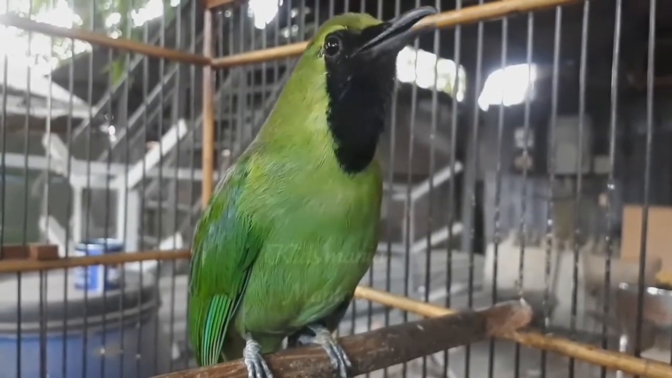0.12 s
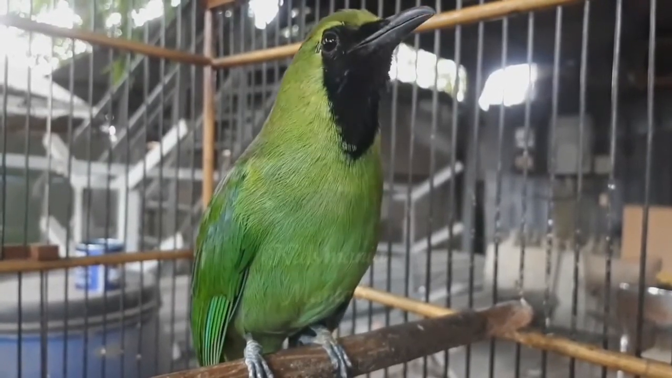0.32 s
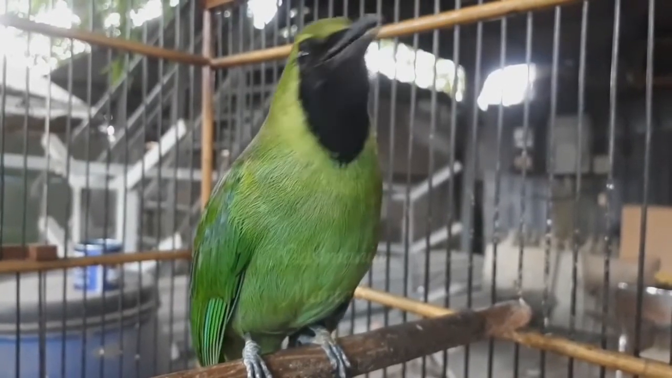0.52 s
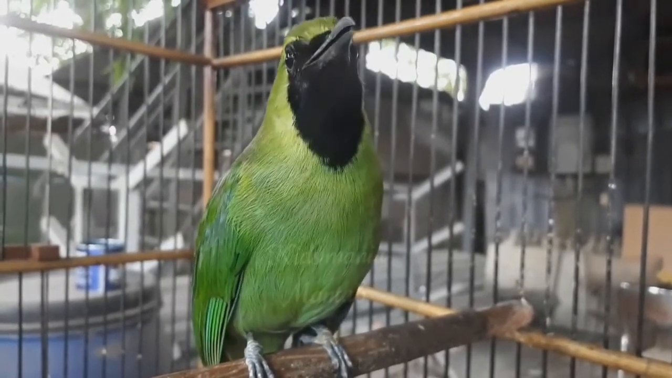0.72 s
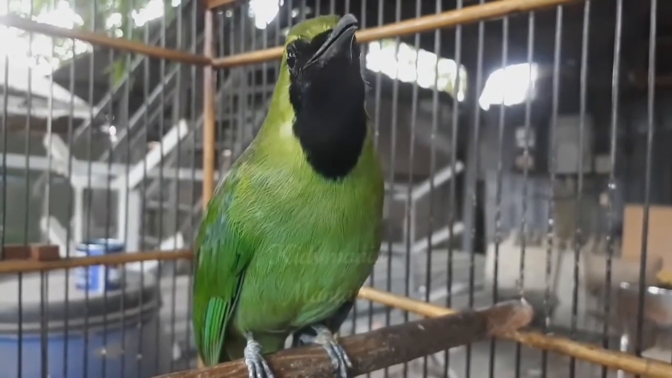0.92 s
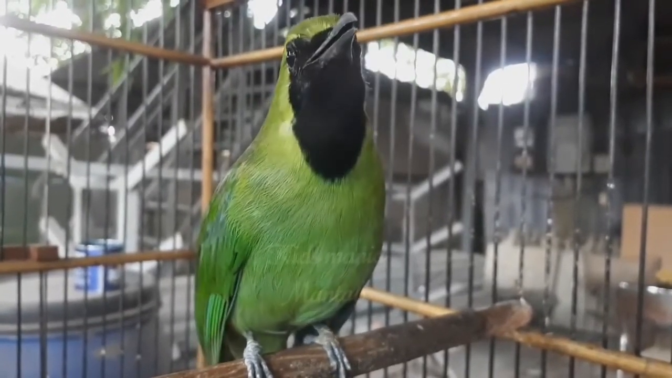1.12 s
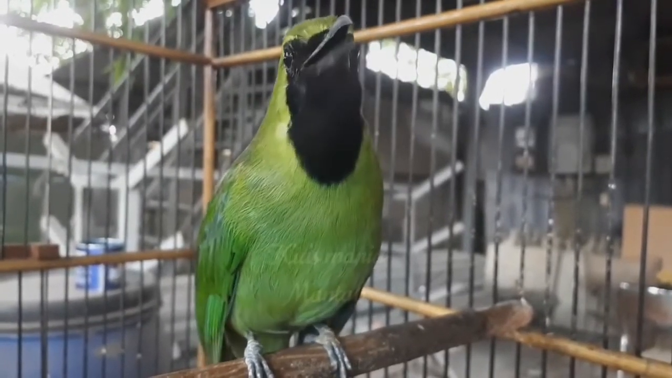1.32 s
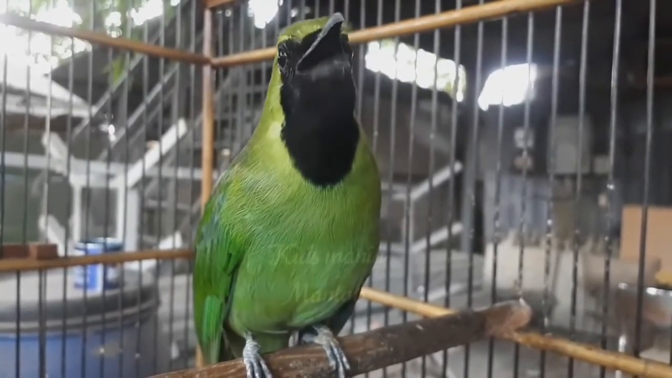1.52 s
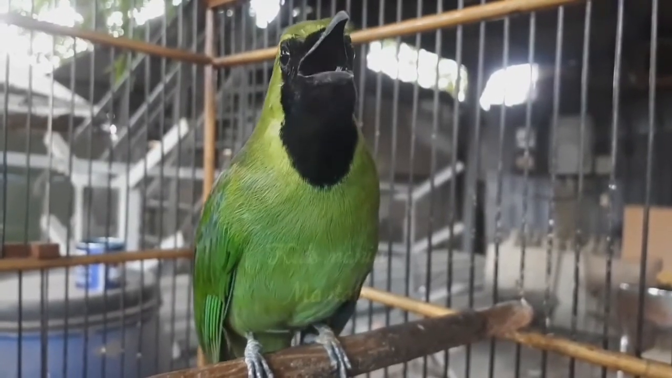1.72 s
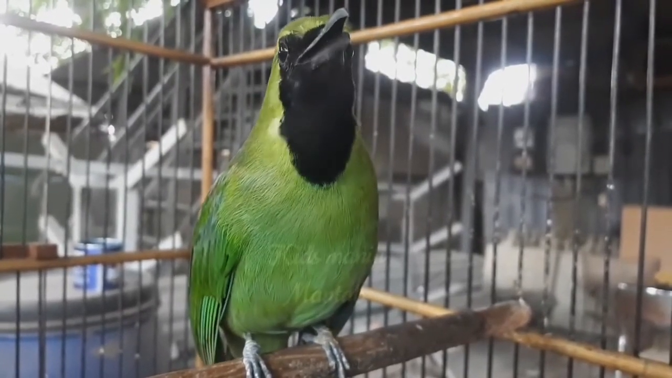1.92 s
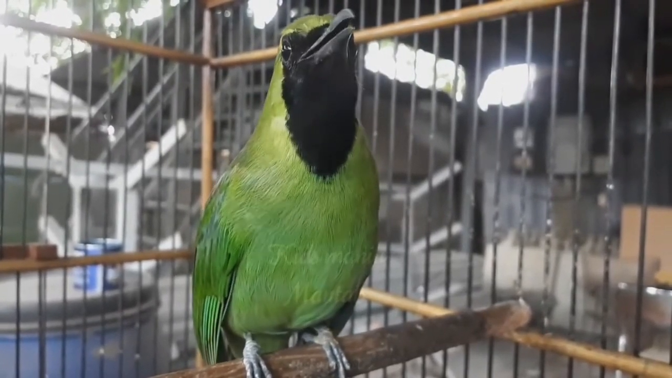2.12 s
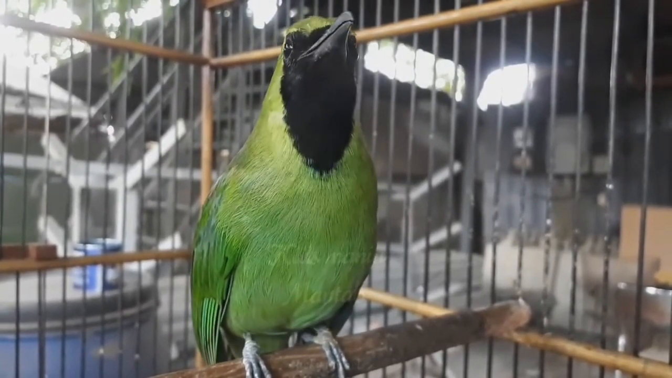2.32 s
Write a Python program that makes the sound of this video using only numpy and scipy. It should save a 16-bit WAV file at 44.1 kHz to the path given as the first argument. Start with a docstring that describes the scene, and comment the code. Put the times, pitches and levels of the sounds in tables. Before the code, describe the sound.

A caged songbird sings loudly, close up. Two tiny ticks lead to a clear falling whistle at 0.2 s. A rough, fast buzz comes at 0.7 s, then short whistles from 0.9 to 1.3 s, about ten per second. Six sharp two-voiced chirps climb higher from 1.37 to 1.94 s; a whistled flourish ends at 2.2 s. Behind: short room echo, low hum, soft air, slowly growing distant noise, a faint far call near the end.

```python
"""Over a low hum come two tiny ticks and a falling whistle: a caged leafbird sings close to the microphone.
A buzz follows, then a run of whistles that turns into two-voiced chirps, and a closing flourish.
Each side of its voice organ (the syrinx) is a near-pure wavering tone with weak overtones and airy rasp.
Short noise bursts make the ticks before many notes. Fading noise makes the room ring; behind it lie
steady air noise, a slowly growing far-off noise and a faint distant call."""
import sys
import numpy as np
from scipy import signal
from scipy.fft import rfft, irfft
from scipy.io import wavfile
from scipy.ndimage import uniform_filter1d, minimum_filter1d

SR = 44100
rng = np.random.default_rng(int(sys.argv[2]) if len(sys.argv) > 2 else 0)


def put_to_file(sound):
    """Save the sound as 16-bit audio at rate SR, in the file named by the first command-line argument."""
    columns = np.atleast_2d(sound).T  # one column per channel
    safe = np.clip(columns, -1, 1)
    whole_steps = np.round(safe * 32767)
    wavfile.write(sys.argv[1], SR, whole_steps.astype(np.int16))


N = 108045
T = np.arange(N) / SR  # time of each sample, s


def amp(db):
    """Turn decibels into a gain."""
    return 10 ** (np.asarray(db) / 20)


def gain_at(hz, points):
    """Read the gain at a pitch from a (frequency [Hz], level [dB]) curve."""
    point_hz, point_db = np.array(points, float).T
    return amp(np.interp(np.log(np.maximum(hz, 1)), np.log(point_hz), point_db))


def colour(x, points):
    """Make some frequencies louder or softer, following a (frequency [Hz], level [dB]) curve."""
    n = x.shape[-1]
    hz = np.arange(n // 2 + 1) * SR / n
    return irfft(rfft(x) * gain_at(hz, points), n)


def noise(points):
    """Coloured noise with an rms of 1."""
    x = colour(rng.standard_normal(N), points)
    return x / x.std()


def wander(rate):
    """Smooth random drift of spread 1, with changes up to about rate [Hz]."""
    hz = np.arange(N // 2 + 1) * SR / N
    x = irfft(rfft(rng.standard_normal(N)) * np.exp(-(hz / rate) ** 2), N)
    return x / x.std()


def gate(start, end, edge):
    """The syrinx opens and closes softly, taking edge [s] each way."""
    return np.sin(np.pi / 2 * np.clip(np.minimum(T - start, end - T) / edge, 0, 1)) ** 2


WARBLE_HZ = 114.5  # pitch swings per second


def warble(crest):
    """Fast swing of the pitch, highest at time crest [s]."""
    return np.cos(2 * np.pi * WARBLE_HZ * (T - crest))


# How the throat passes the main tone: (frequency [Hz], gain [dB])
THROAT = [(1300, -6), (3000, 6), (3500, -4), (4100, -4.5), (5800, -22)]
# Strength of harmonics 2 to 8 against the main tone before the throat, before offset and flicker: (level [dB])
OVERTONE_DB = [-31.5, -42.5, -39.5, -31, -41.5, -47, -47]
# Tone colour of the rasping air in the throat: (frequency [Hz], relative level [dB per Hz])
RASP = [(500, -6), (1100, -4.5), (3200, 6), (4900, 2.5), (7500, 0), (10500, -6.5), (12500, -1.5),
        (15500, -13.5)]


def voice(notes, jitter, overtone_db=0):
    """One syrinx side plays (pitch, envelope, rasp dB) notes as a near sine with flickering overtones and rasp."""
    env = sum(e for _, e, _ in notes)
    steady_hz = sum(f * e for f, e, _ in notes) / (env + 1e-12)
    hz = steady_hz * (1 + jitter * wander(450))
    phase = 2 * np.pi * np.cumsum(hz) / SR
    tone = gain_at(hz, THROAT) * np.sin(phase)
    for k, db in enumerate(OVERTONE_DB, 2):
        level = amp(db + overtone_db + 4 * wander(330))
        tone = tone + (k * hz < SR / 2) * level * np.sin(k * phase)  # skip what is too high to store
    rasp = noise(RASP) * sum(e * amp(db) for _, e, db in notes)
    return np.sqrt(2) * env * tone + rasp


CLEAN_JITTER, ROUGH_JITTER = 0.0048, 0.0239  # random pitch drift, as a share of the pitch
EDGE_S = 0.006  # soft start and end of most notes


def bow(u, first, middle, last):
    """Smooth curve (a parabola) through three values as u runs from 0 to 1."""
    return first + (last - first) * u + 2 * (2 * middle - first - last) * u * (1 - u)


def glide(start, length, f0, f1, f2, d0, d1, d2, lateness=1):
    """Pitch and envelope of a whistle: both follow a smooth bow."""
    u = np.clip((T - start) / length, 0, 1) ** lateness
    return bow(u, f0, f1, f2), amp(bow(u, d0, d1, d2)) * gate(start, start + length, EDGE_S)


# Short whistles; pitch is before the warble, level before the throat, rasp against the note:
# (start [s], length [s], first, middle, last pitch [Hz], first, middle, last level [dB],
#  warble depth [Hz], rasp [dB])
SHORT_WHISTLES = [ (0.919, 0.029, 3160, 3450, 3170, -69, -25, -24.5, 47, -28),
                  (0.942, 0.048, 3101, 2315, 2050, -16, -8.5, -12, 15, -26),
                  (1.059, 0.052, 2090, 2046, 1561, -36.5, -8, -24.5, 14, -31),
                  (1.166, 0.046, 2066, 1978, 1555, -29, -7, -17.5, 6.3, -35.5),
                  (1.28, 0.039, 1626, 1790, 1421, -22.5, -6, -16.5, 157, -30.5),
                  (2.007, .031, 2094, 2434, 2466, -17.5, -10, 2.5, 53, -38),
                  (2.034, 0.021, 2522, 2734, 2877, -36, -13.5, -36, 320, -21.5),
                  (2.151, 0.045, 3006, 2608, 2244, -24, -16, -9.5, 10, -18)]
# Long whistles, the same but without warble; a lateness above 1 delays the middle:
# (start [s], length [s], first, middle, last pitch [Hz], first, middle, last level [dB],
#  lateness [exponent], rasp [dB])
LONG_WHISTLES = [ (.202, 0.11, 2488, 2036, 1931, -21, -5, -13, .85, -56),
                 (2.05, 0.11, 1644, 1917, 1335, -22, -7.5, -24.5, 1.6, -31.5)]


def whistles():
    """Clean glides, each group sung by a single voice; the short ones warble."""
    short = []
    for *shape, depth, rasp_db in SHORT_WHISTLES:
        hz, env = glide(*shape)
        start, length = shape[:2]
        short.append((hz + depth * warble(start + length / 3), env, rasp_db))
    long = [(*glide(*shape), rasp_db) for *shape, rasp_db in LONG_WHISTLES]
    return voice(short, 2 * CLEAN_JITTER) + voice(long, CLEAN_JITTER, overtone_db=-2)


CHIRP_TOP_SHARE = .41  # the upper voice peaks this far into a chirp
CHIRP_WARBLE_HZ, ARCH_WARBLE_HZ = 66.8, 110  # steady warble depth of the upper and lower voice
CHIRP_EDGE_S = 0.0039
ARCH_DROP_DB = -3.5  # added once at the top of an arch, twice at its foot
ARCH_SKEW = .85  # below 1 the arch peaks early
YIELD = 0.68  # share of loudness the upper voice gives up at the top of an arch
COUPLING_DB = -5  # the two voices mix into sum and difference tones
RASP_ROUGH_DB = -25.5  # against the note

# Upper voice of the chirps; pitch is before the warble, level before yielding and the throat:
# (start [s], length [s], first, top, last pitch [Hz], bend of the fall [exponent], level [dB],
#  extra warble depth at the top of an arch [Hz])
CHIRPS = [ (1.372, 0.048, 2006, 2976, 1600, 0.68, -13, 370),
          (1.473, 0.047, 1926, 3260, 1900, 0.67, -12, 431),
          (1.570, .053, 2221, 4300, 2400, 2.1, -14.5, 101), (1.67, 0.054, 2199, 4898, 2700, 3.27, -12, 50),
          (1.782, .056, 2332, 5576, 3050, 1.9, -13.5, 50.9),
          (1.881, 0.059, 2597, 5980, 2700, 3.8, -14.5, 50)]
# Arches of the lower voice under buzz and chirps; pitch before the warble, level before drop and throat:
# (start [s], length [s], foot pitch [Hz], top pitch [Hz], level [dB])
ARCHES = [ (0.71, .025, 2067, 2690, -14.5), (1.379, 0.034, 1242, 1702, -12), (1.482, 0.03, 1348, 1735, -13),
          (1.576, 0.024, 1495, 2386, -11), (1.683, 0.016, 1737, 2297, -13.5),
          (1.791, .028, 1916, 3016, -4.5), (1.889, .023, 2000, 3022, -3.5)]


def chirps():
    """The upper voice shoots up and falls back, shaking harder while the lower one arches beneath it."""
    upper, lower, busy = [], [], 0
    for start, length, foot, top, db in ARCHES:
        arch = np.sin(np.pi * np.clip((T - start) / length, 0, 1) ** ARCH_SKEW)
        hz = foot + (top - foot) * arch + ARCH_WARBLE_HZ * warble(start)
        env = amp(db + ARCH_DROP_DB * (2 - arch)) * gate(start, start + length, EDGE_S)
        lower.append((hz, env, RASP_ROUGH_DB))
        busy = busy + arch
    for start, length, first, top, last, bend, db, depth in CHIRPS:
        u = np.clip((T - start) / length, 0, 1)
        rise = first + (top - first) * u / CHIRP_TOP_SHARE
        fall = last + (top - last) * ((1 - u) / (1 - CHIRP_TOP_SHARE)) ** bend
        shake = (CHIRP_WARBLE_HZ + depth * busy) * warble(start)
        hz = np.where(u < CHIRP_TOP_SHARE, rise, fall) + shake
        env = amp(db) * (1 - YIELD * busy) * gate(start, start + length, CHIRP_EDGE_S)
        upper.append((hz, env, RASP_ROUGH_DB))
    high = voice(upper, ROUGH_JITTER, overtone_db=4)
    low = voice(lower, ROUGH_JITTER, overtone_db=4)
    return high + low + amp(COUPLING_DB) * high * low


def traced(rows):
    """Pitch and envelope of a note that follows (time [s], pitch [Hz], level [dB]) points."""
    s, hz, db = np.array(rows, float).T
    opening = gate(s[0] - EDGE_S / 2, s[-1] + EDGE_S / 2, EDGE_S)
    return np.interp(T, s, hz), amp(np.interp(T, s, db)) * opening


BUZZ_DEPTH_HZ, BUZZ_LOW_DEPTH_HZ = 445, 251  # warble depth of the upper and lower voice
BUZZ_WARBLE_FROM_S, BUZZ_CREST_S = .728, .790
RASP_BUZZ_DB = -20.5  # against the note, before the treble cut

# Path of the buzz, pitch before the warble, level before the throat and treble cut:
# (time [s], upper pitch [Hz], upper level [dB], lower pitch [Hz], lower level [dB])
BUZZ = [(.701, 2668, -29.5, 1923, -25.5), (0.706, 3412, -6, 2026, -34.5), (0.72, 5150, -15.5, 2250, -45),
        (0.74, 3050, -12.5, 2150, -30), (0.763, 3200, -12.5, 2199, -29), (0.784, 3490, -7.5, 2643, -11.5),
        (0.805, 3300, -12.5, 2684, -41), (.817, 3025, -19, 2550, -24)]


def buzz():
    """The upper voice swoops up and down, then both voices warble quickly together."""
    s, high, high_db, low, low_db = np.array(BUZZ).T
    shake = warble(BUZZ_CREST_S) * gate(BUZZ_WARBLE_FROM_S, T[-1], CHIRP_EDGE_S)
    out = 0
    for hz, db, depth in ((high, high_db, BUZZ_DEPTH_HZ), (low, low_db, BUZZ_LOW_DEPTH_HZ)):
        pitch, env = traced(np.c_[s, hz, db])
        out = out + voice([(pitch + depth * shake, env, RASP_BUZZ_DB)], ROUGH_JITTER)
    return colour(out, [(9000, -1), (12000, -17), (15000, -8)])


TICK_S = 0.0021  # time from the peak until a tick has fallen to about a third
CHIRP_TICK_LEAD_S, CHIRP_TICK_DB = .007, -36

# Ticks before whistles and buzz: (time [s], level [dB])
TICKS = [(0.151, -33.5), (0.165, -49), (0.691, -36.5), (0.697, -28), (.917, -38), (1.057, -37.5),
         (1.16, -33.5), (1.268, -30.5), (2.003, -28)]
# Tone colour of a tick: (frequency [Hz], relative level [dB])
TICK_COLOUR = [(200, -25.5), (650, 0.5), (2600, 10.5), (5000, -28.5)]


def ticks():
    """Tiny clicks of beak and throat just before notes: noise in very short bursts."""
    rows = list(TICKS) + [(row[0] - CHIRP_TICK_LEAD_S, CHIRP_TICK_DB) for row in CHIRPS]
    bursts = sum(amp(db) * np.exp(-((T - s) / TICK_S) ** 2) for s, db in rows)
    return noise(TICK_COLOUR) * bursts


EARLY_DB, EARLY_T60_S = -18, 0.13  # level before the room colour; time to fade by 60 dB
ROOM_DB, ROOM_T60_S = -26, 0.48

# Tone colour of the echoes: (frequency [Hz], gain [dB])
ROOM_COLOUR = [(2500, 6.5), (6500, 5.5), (14000, 8)]


def room(x):
    """Near surfaces scatter the song almost at once; the room rings on: both are fading noise echoes."""
    t = T[:SR]
    out = 0
    for db, t60, gap in ((EARLY_DB, EARLY_T60_S, .002), (ROOM_DB, ROOM_T60_S, .012)):
        tail = rng.standard_normal((2, SR)) * np.exp(-np.log(1000) * t / t60) * (t > gap)
        tail = tail / np.sqrt(np.sum(tail ** 2, axis=1, keepdims=True))
        tail = colour(tail, ROOM_COLOUR)
        out = out + amp(db) * signal.fftconvolve(x[None], tail, axes=1)[:, :N]
    return out


FLOOR_DB = -52.5  # level of the air noise, before the side part is coloured
HUM_HZ, HUM_WIDTH_HZ, HUM_DB = 140.6, 6.3, -56.5
SWELL_DB, SWELL_DB_PER_S = -78.5, 10.5  # level at the start, and its growth

# Tone colour of the steady air: (frequency [Hz], relative level [dB per Hz])
FLOOR = [(22, -26), (50, -7.5), (140, -2.5), (350, -15), (750, -17), (1500, -25), (2300, -23),
         (15000, -51.5)]
# Tone colour of the far-off noise that slowly grows: (frequency [Hz], relative level [dB])
SWELL = [(120, -17.5), (450, -1), (2000, -35.5)]
# Path of the far-off call: (time [s], pitch [Hz], level [dB])
FAR_CALL = [(2.09, 730, -50), (2.2, 715, -44.5), (2.25, 780, -49), (2.45, 770, -57)]


def background():
    """Steady air and a wavering low hum; far away, noise swells and something calls faintly."""
    hum_phase = 2 * np.pi * HUM_HZ * T
    hum = wander(HUM_WIDTH_HZ) * np.cos(hum_phase) + wander(HUM_WIDTH_HZ) * np.sin(hum_phase)
    mid = amp(FLOOR_DB) * noise(FLOOR) + amp(HUM_DB) * hum
    side = amp(FLOOR_DB) * colour(noise(FLOOR), [(120, -13), (700, -2.5)])  # makes left and right differ
    hz, env = traced(FAR_CALL)
    far = []
    for _ in range(2):  # left, right
        call = env * np.sin(2 * np.pi * np.cumsum(hz) / SR + wander(40))
        swell = amp(SWELL_DB + SWELL_DB_PER_S * T) * noise(SWELL)
        far.append(call + swell)
    return np.array([mid + side, mid - side]) + np.array(far)


# Lag of the right microphone port round the housing: (frequency [Hz], lag [s])
PORT_LAG = [(3000, 0.00011), (10000, 0.0001356)]


def scene():
    """The song reaches the left microphone port a moment before the right."""
    song = whistles() + chirps() + buzz() + ticks()
    hz = np.arange(N // 2 + 1) * SR / N
    lag = np.interp(hz, *np.array(PORT_LAG).T)
    late = irfft(rfft(song) * np.exp(-2j * np.pi * hz * lag), N)
    return np.array([song, late]) + room(song) + background()


LIMIT, LIMIT_S = .95, .003  # highest peak before the top is cut; smoothing time of the limiter
TOP_HZ = 15600


def record(dry):
    """The recorder turns down any peaks above the limit and cuts the top frequencies."""
    size = int(LIMIT_S * SR)
    peak = np.abs(dry).max(axis=0)
    lowest_gain = minimum_filter1d(LIMIT / np.maximum(peak, LIMIT), 2 * size)
    gain = uniform_filter1d(lowest_gain, size)
    top_cut = signal.ellip(8, .2, 70, TOP_HZ, fs=SR, output="sos")
    return signal.sosfilt(top_cut, dry * gain)


dry = scene()
out = record(dry)
put_to_file(out)
```